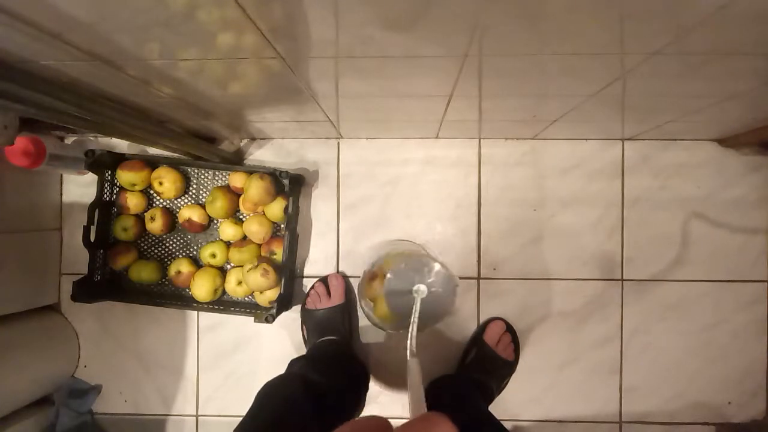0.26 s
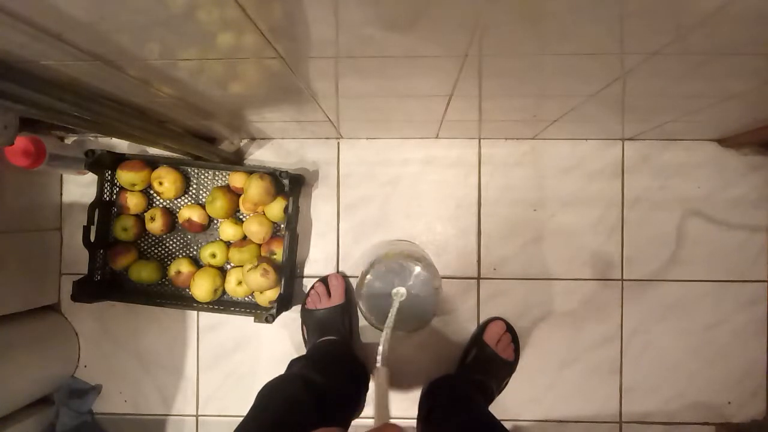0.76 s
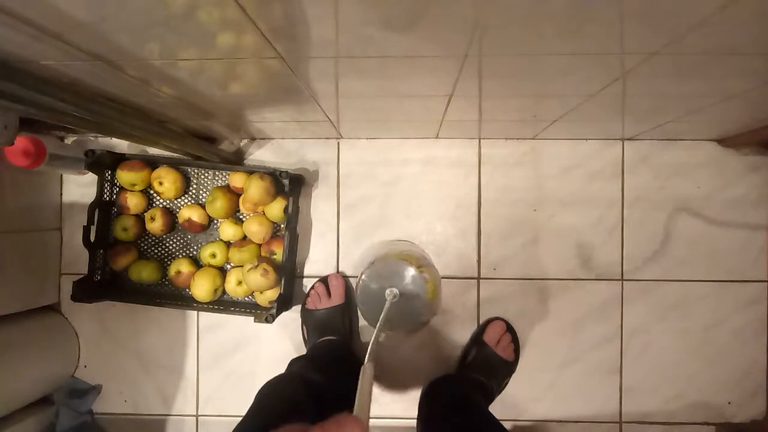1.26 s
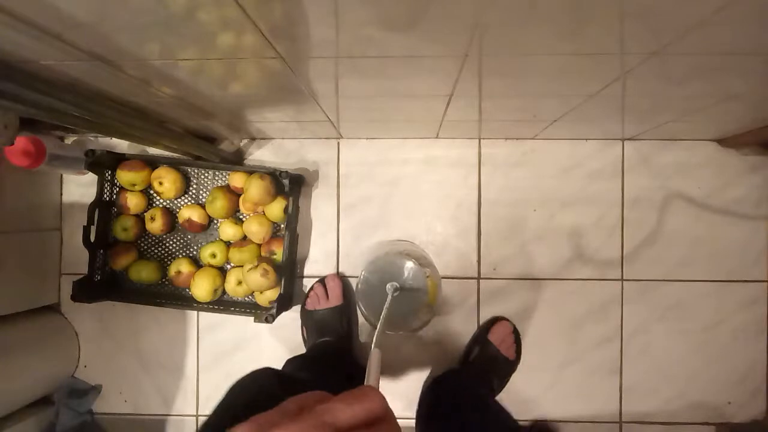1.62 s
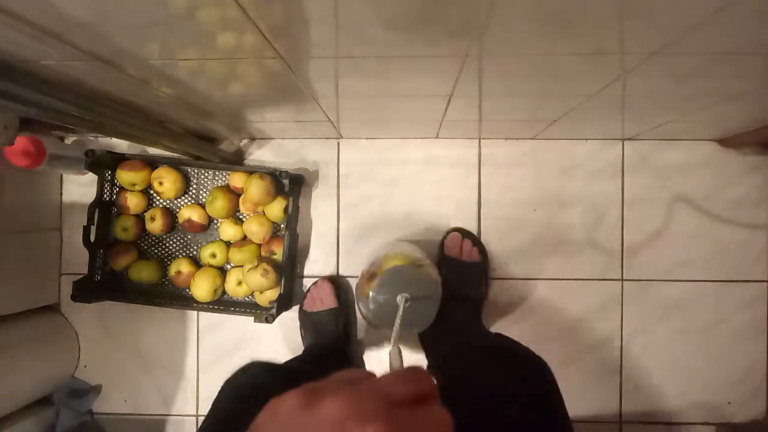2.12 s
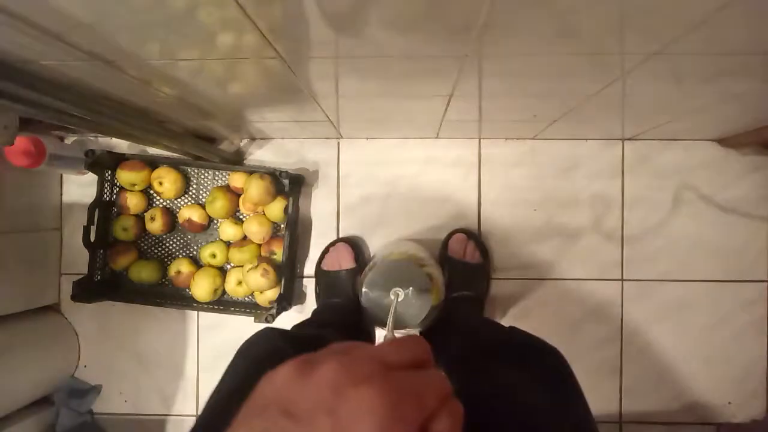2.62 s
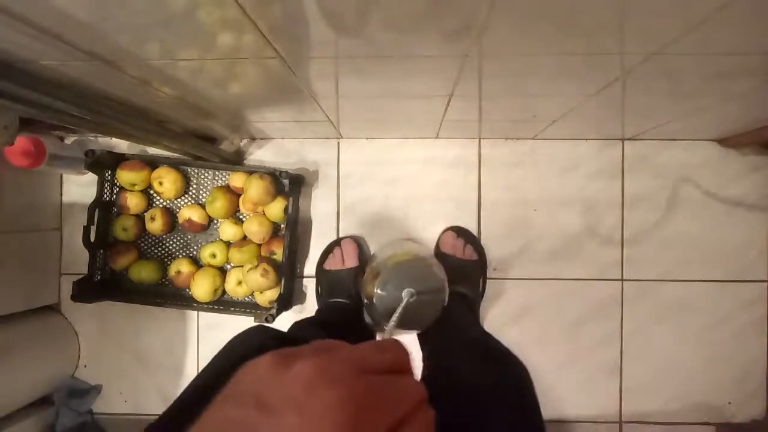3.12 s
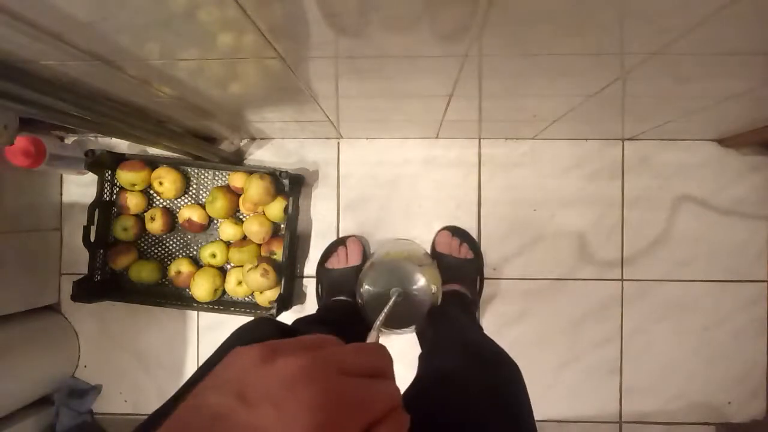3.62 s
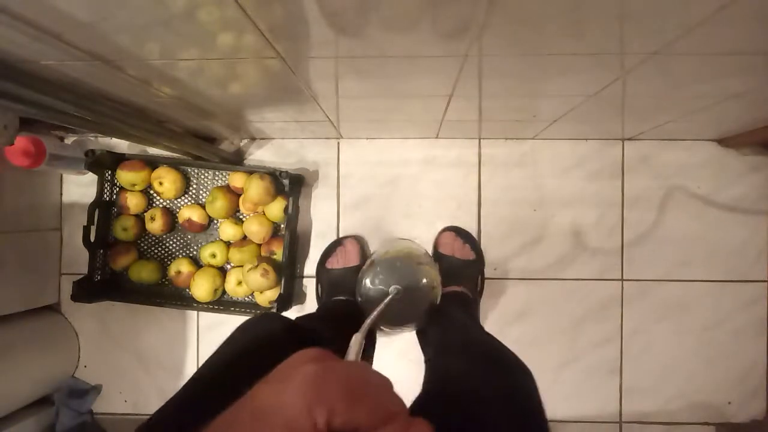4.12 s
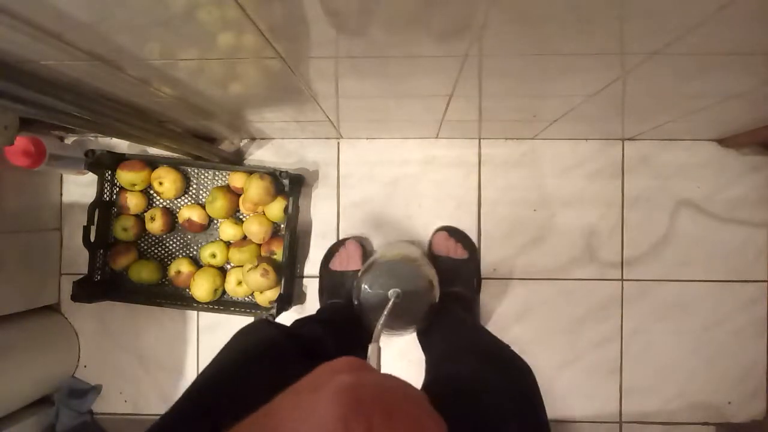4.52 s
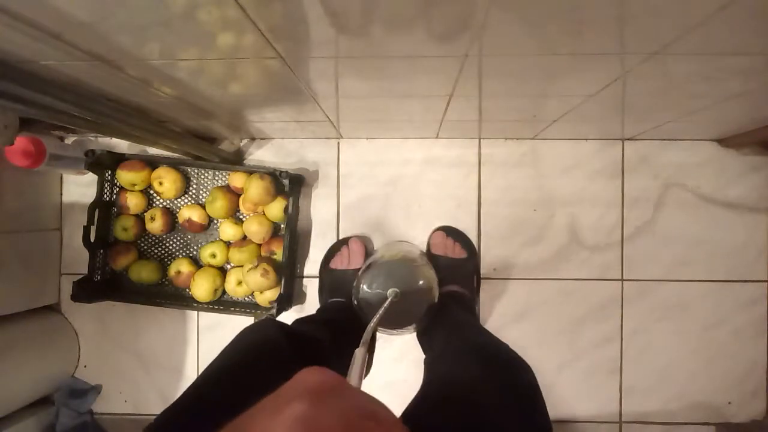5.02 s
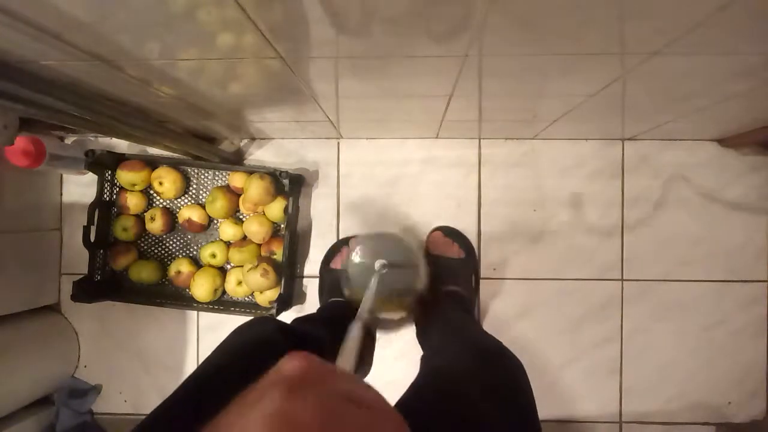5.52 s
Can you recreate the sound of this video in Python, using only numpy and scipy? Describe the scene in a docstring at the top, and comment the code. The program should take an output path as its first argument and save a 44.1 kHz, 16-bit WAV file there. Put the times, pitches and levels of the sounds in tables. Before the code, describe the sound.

Hollow plastic knocks, wet fruit crunches and sandal shuffles grow rougher for five seconds before a drill bursts into dense rattling churn and whine.

```python
"""In a small tiled room a steel rod on a drill pokes about in a plastic bottle of apples on the floor.
From the start it knocks the wall (noise contacts, rung modes) and rubs the fruit (filtered random clicks);
the bottle booms, the floor shudders, sandals shuffle (swells of hiss), later the tip squeaks (short sines).
From 5.2 s the drill spins up: rub and rumble grow, apple lumps hit the wall (damped sines), a motor whines."""
import sys
import numpy as np
from scipy import signal
from scipy.fft import rfft, irfft
from scipy.io import wavfile
from scipy.ndimage import uniform_filter1d

SR = 44100
rng = np.random.default_rng(int(sys.argv[2]) if len(sys.argv) > 2 else 0)


def unload_audio(sound):
    """Save the sound as a 16-bit wav file, at the path given as the first command line argument."""
    columns = np.transpose(np.atleast_2d(sound))
    # keep every value between -1 and 1, then stretch to whole-number steps
    steps = np.round(np.clip(columns, -1, 1) * 32767)
    wavfile.write(sys.argv[1], SR, steps.astype(np.int16))


N = 254016
T = np.arange(N) / SR

# Sign of the side signal, left then right.
SIDES = np.array([[1], [-1]])
# Rod blows. Each row: start in seconds, wall ring level in dB, ring pitch in Hz, thump level in dB,
# crunch level in dB, crack level in dB, contact in ms.
KNOCKS = [(0.003, -37, 625, -29.5, -35.5, -43, 9.1), (0.095, -24.5, 796, -32, -25.5, -33, 11.6),
          (0.114, -24.5, 830, -24.5, -45, -52, 6.7), (0.195, -26.5, 690, -34, -31, -40, 12.3),
          (0.289, -31.5, 1040, -13.5, -42, -53, 9.5), (0.323, -32, 2150, -33, -29.5, -34.5, 12.6),
          (0.384, -60, 900, -60, -45, -37, 1.5), (0.422, -31.5, 600, -15.5, -27.5, -32, 10.8),
          (0.538, -31.5, 820, -29, -37.5, -43.5, 5.1), (0.652, -52, 660, -41, -71, -73, 4.7),
          (0.721, -34.5, 660, -25, -46, -54, 78), (0.772, -21.5, 730, -24, -23, -22, 22.3),
          (0.867, -13.5, 680, -25, -9.5, -14, 11.1), (0.888, -37, 515, -16, -42, -45, 5.8),
          (1.035, -32, 520, -59, -48, -52, 9.1), (1.248, -40, 820, -25.5, -50, -45, 12.4),
          (1.341, -25, 800, -23, -20, -32.5, 21.5), (1.363, -15, 760, -14.5, -43, -29, 1.4),
          (1.441, -26, 574, -50, -26, -29.5, 8.8), (1.572, -33, 1400, -39, -27.5, -37, 3.9),
          (1.722, -13.5, 915, -9.5, -11.5, -18.5, 11.7), (1.808, -31, 530, -44, -32, -53, 5.9),
          (1.871, -30.5, 557, -52, -35, -43, 13), (1.886, -23, 510, -20, -18.5, -27.5, 18),
          (1.955, -30, 684, -17, -34, -33, 12), (2.046, -32.5, 506, -32, -34.5, -38, 12),
          (2.129, -26, 764, -33, -31, -33.5, 8), (2.147, -29.5, 900, -21, -29, -35, 6),
          (2.326, -31.5, 640, -36, -45, -44.5, 52), (2.384, -37, 826, -21, -40, -38.5, 83),
          (2.609, -24, 656, -39, -25.5, -32, 7.9), (2.62, -15, 1230, -14, -15, -23.5, 6.5),
          (2.716, -16, 470, -13.5, -24.5, -37, 8.6), (2.912, -18.5, 855, -25.5, -20.5, -28, 15.4),
          (2.995, -25.5, 654, -21, -26, -28.5, 10), (3.1, -32.5, 825, -39.5, -49, -47, 65),
          (3.128, -32, 620, -23, -27, -39, 7.9), (3.171, -19, 910, -48, -15, -20.5, 8.6),
          (3.284, -12, 1960, -18, -11, -23, 10.2), (3.308, -16.5, 1910, -21, -11.5, -41, 7.5),
          (3.36, -18.5, 810, -27, -24, -77, 10), (3.387, -21.5, 680, -34, -26, -31, 6.8),
          (3.447, -11, 1770, -40, -16, -36, 6.4), (3.456, -27, 1400, -38, -23, -36, 6.5),
          (3.472, -34, 603, -46, -43, -23, 8.4), (3.504, -61, 748, -49, -53, -25.5, 6.2),
          (3.55, -6.5, 940, -6.5, -9.5, -9.5, 7.9), (3.578, -16.5, 714, -1.5, -18, -25.5, 17.7),
          (3.655, -5.5, 654, -31, -9, 0, 4.1), (3.701, -20.5, 610, -7.5, -29, -30.5, 36),
          (3.778, -32, 610, -48, -64, -26.5, 8.7), (3.85, -31, 1300, -69, -35, -30, 3.9),
          (3.917, -27.5, 1340, -28, -27.5, -26.5, 1.8), (3.97, -38, 736, -50, -45, -35, 5.1),
          (4.166, -22.5, 670, -24, -34, -44, 3.1), (4.189, -17, 1350, -25, -8.5, -4.5, 5.7),
          (4.231, -8.5, 2920, -31, -20, -7.5, 17.5), (4.369, -14, 1230, -38, -51, -2, 6.1),
          (4.433, -8, 680, -11.5, -19, -4.5, 3.3), (4.469, -16.5, 714, -37, -10.5, 0.5, 7.3),
          (4.522, -12.5, 706, -12, -11.5, -20, 11.3), (4.555, -7.5, 1290, -46, -33, 3, 2.84),
          (4.58, -18, 710, -27, -25, -38, 5.8), (4.611, -20.5, 695, -17, -31, -32, 29),
          (4.632, -15.5, 460, -16, -18, -43, 3.4), (4.774, -32, 1250, -62, -30, -47, 2),
          (4.843, -35.5, 1870, -34, -63, -27, 15.7), (4.992, -39.5, 860, -31.5, -50, -70, 57),
          (5.023, -31, 470, -50, -50, -25.5, 5.6), (5.063, -32, 470, -56, -43, -33, 13),
          (5.103, -34, 2570, -44, -52, -56, 6.3), (5.122, -39, 2700, -48, -44, -42, 5.4),
          (5.146, -53, 2700, -54, -34, -34, 5.6), (5.162, -32, 1440, -53, -28, -18.5, 5.4),
          (5.182, -21, 1300, -38, -21.5, -23, 16), (5.207, -34, 1350, -32, -21, -33, 5.2),
          (5.228, -16, 2170, -46, -52, -2, 7.4), (5.29, -21.5, 805, -20, -10, -30, 13),
          (5.322, -32, 670, -12, -10, -37, 9), (5.368, -6.5, 920, -9.5, -11, -14.5, 5.7),
          (5.395, -14, 1400, -23, -13, -18, 10), (5.424, -7.5, 706, -11, -8, -23, 11),
          (5.447, -14, 1400, -28, -5.5, -38, 5.6), (5.468, -16, 725, -9, -25, -37, 15),
          (5.489, -21, 770, -28, -33, -36, 2.8), (5.518, -18, 710, -21, -20, -25, 4.7),
          (5.532, -19, 810, -17, -10, -12.5, 10), (5.561, -13, 560, -3, -9.5, -17, 19),
          (5.589, -12, 1800, -27, -16, -20, 2.7), (5.628, -10, 724, -17, -7.5, -10.5, 11.8),
          (5.677, -12, 1360, -1, -28, -28, 1.4), (5.708, -19, 1520, -4, -29, -37, 4.4),
          (5.728, -12, 514, -15, -9.5, -33, 6.6), (5.75, -14, 1600, -20, -10, -11, 5.2)]
# Modes of the bottle wall and its air. Each row: pitch in Hz, relative level in dB, T60 in seconds.
BOTTLE = [(169, -12, 0.43), (214, 7, 0.079), (229, 4.5, 0.31), (250.3, 1.5, 0.27), (304, -19.5, 0.38),
          (351.8, -8, 0.41), (421.2, -2.5, 0.2), (442.5, -13.5, 0.65), (592.4, 0.5, 0.14),
          (720, -5.5, 0.26), (763, -7.5, 0.44), (807, -5, 0.19), (938, 8, 0.056), (1249, -5.5, 0.32),
          (1396, 17, 0.04)]
# The boom as feet and fruit shift. Each row: time in seconds, upper deep mode over the lower ones in dB,
# shaking by the rod in dB.
BOOM = [(0.0, 19, -68), (0.06, 33, -79), (0.18, 26, -74), (0.23, 16, -69), (0.4, 16, -62), (0.6, -14, -103),
        (0.8, -1, -59.5), (0.92, -28.5, -95), (1.1, -13, -85), (1.28, 13, -63), (1.4, -16, -71),
        (1.65, 11, -64.5), (1.8, -6, -59.5), (2.1, -5, -68.5), (2.3, -10, -70), (2.5, 10, -61),
        (2.75, -5, -90), (2.88, -1, -78), (3.3, -6, -59), (3.52, -13.5, -83), (3.66, 4, -59),
        (3.8, -9, -67.5), (4.05, -10, -87), (4.3, -9, -57.5), (4.45, 4, -71), (4.62, -4, -61.5),
        (4.8, -2, -78), (5.05, -11, -80), (5.2, 0, -80), (5.4, 1, -57), (5.76, -8, -62)]
# Spectrum of cracks and rasp. Each row: frequency in Hz, gain in dB.
CRACK = [(400, -25), (1500, -9.5), (3000, -6), (4500, -3.5), (6000, 0), (8000, -6.5), (11000, -13),
         (13500, -20), (15000, -10.5), (15600, -16)]

MODE_HZ = np.array(BOTTLE)[:, :1]
DEEP_TOP_HZ, UPPER_DEEP_HZ = 280, 240  # whole-bottle modes lie below the first
DRILL_ON_S, SPIN_UP_S = 5.2, 0.13  # trigger pulled; time to full speed


def undb(db):
    """Decibels to gain."""
    return 10 ** (np.asarray(db) / 20)


def unit(x):
    """Scale to rms 1."""
    return x / np.sqrt(np.mean(x ** 2))


def smooth_noise(width):
    """Slow random signal of rms 1: white noise averaged over a width in samples."""
    return unit(uniform_filter1d(rng.standard_normal(N), width))


def colour(x, points, power=1):
    """Filter along the last axis by (Hz, dB) points, the dB scaled by power."""
    hz, db = np.transpose(points)
    f = np.maximum(np.fft.rfftfreq(x.shape[-1], 1 / SR), 1)
    gain_db = power * np.interp(np.log(f), np.log(hz), db)
    return irfft(rfft(x) * undb(gain_db), x.shape[-1])


def uneven(points, chance, depth_db):
    """A colour with random third-octave bumps: no two spots of wall or fruit sound alike."""
    hz = 300 * 2 ** (np.arange(len(chance)) / 3)
    point_hz, point_db = np.transpose(points)
    base_db = np.interp(np.log(hz), np.log(point_hz), point_db)
    return [(100, base_db[0] - 20)] + list(zip(hz, base_db + depth_db * chance))


def ring(x, hz, t60_s):
    """One damped mode, a complex one-pole resonator."""
    pole = np.exp(2j * np.pi * hz / SR - np.log(1000) / (max(t60_s, .002) * SR))
    return signal.lfilter([1], [1, -pole], x).imag


def grains(rate_hz, spread_db):
    """Random clicks with a few much larger than the rest."""
    when, sign, size = rng.random((3, N))
    return (when < rate_hz / SR) * np.sign(sign - .5) * undb(-spread_db * np.log(size + 1 / 50))


def spin(power):
    """Crusher speed from 0 to 1, raised to a power."""
    return np.clip((T - DRILL_ON_S) / SPIN_UP_S, 0, 1) ** power


def bottle(drives, lo_hz, hi_hz):
    """The bottle's modes between two frequencies, each with its own drive and its own lean to one side."""
    swell_t60_s = 0.092
    out = 0
    s, upper_db, _ = np.transpose(BOOM)
    tilt_db = np.interp(T, s, upper_db) / 2
    leans = rng.standard_normal(len(BOTTLE))
    for (hz, db, t60_s), drive, lean in zip(BOTTLE, drives, leans):
        if not lo_hz <= hz < hi_hz:
            continue
        drive = drive[:N]
        if 200 < hz < DEEP_TOP_HZ:
            # a second resonance makes the boom swell late
            tilted = drive * undb(tilt_db * np.sign(hz - UPPER_DEEP_HZ))
            drive = ring(tilted, hz, swell_t60_s) * 2 * np.log(1000) / (swell_t60_s * SR)
        out = out + undb(db) * ring(drive, hz, t60_s) * (1 + hz / 1230.0 * lean * SIDES)
    return out


def rumble():
    """Low shudder through the floor: always faint, more after thumps, under footfalls, with the drill on."""
    # Spectrum. Each row: frequency in Hz, gain in dB.
    rumble_colour = [(15, -15), (28, 10), (45, -2), (70, -4.5), (100, 12), (125, 5.5), (160, 10.5),
                     (250, -27.5)]
    # Footfalls on the tiles. Each row: middle in seconds, level in dB.
    footfalls = [(1.97, -47), (2.16, -51), (3.2, -47), (3.92, -34)]
    rest_db, spun_db = -53.5, -30
    jolt_db, jolt_s, footfall_s = -31, 0.032, 0.06  # jolt level is over each thump's own
    mid, side = colour(rng.standard_normal((2, N)), rumble_colour)
    level = undb(rest_db) + undb(spun_db) * spin(2.5)
    for s, _, _, thump_db, *_ in KNOCKS:
        level += undb(thump_db + jolt_db) * (T >= s) * np.exp(-np.abs(T - s) / jolt_s)
    for s, db in footfalls:
        level += undb(db) * np.exp(-((T - s) / footfall_s) ** 2)
    return level * unit(mid + 0.36 * side * SIDES)


def stir():
    """Steel drags over fruit and plastic in dense slips and lumps; separate random jolts shake the bottle."""
    # Rod dragged by hand. Each row: time in seconds, rub level in dB, rasp level in dB.
    drag_levels = [(0.0, -41, -53), (0.35, -32, -57), (0.62, -46.5, -62.5), (0.881, -23.5, -54),
                   (1.102, -48, -61), (1.3, -40, -70), (1.46, -22.5, -51), (1.58, -36, -47.5),
                   (1.8, -26, -45), (2.11, -38.5, -50), (2.19, -31.5, -44), (2.31, -33, -42),
                   (2.44, -33, -45), (2.74, -27, -43), (2.87, -38, -55), (3.37, -23.5, -36.5),
                   (3.53, -61, -71), (3.662, -20, -40), (3.98, -38.5, -49), (4.15, -33, -39),
                   (4.321, -18.5, -29), (4.38, -89, -50), (4.602, -11, -29.5), (4.81, -66, -49.5),
                   (5.05, -22.5, -48.5), (5.2, -67, -55)]
    # Rub spectrum. Each row: frequency in Hz, gain in dB.
    rub_colour = [(100, -55), (250, 13.5), (450, 5.5), (800, 0), (1400, -5), (2200, -5.5), (3500, -14),
                  (6000, -59)]
    spun_rub_db, spun_rasp_db, spun_shake_db = -12, -16, -54  # added at full speed
    s, *columns = np.transpose(drag_levels)
    rub_db, rasp_db = (np.interp(T, s, c) for c in columns)
    lumps_db = smooth_noise(int(SR / 45))

    rub_level = undb(rub_db) + undb(spun_rub_db) * spin(1.5)
    rub = colour(rub_level * undb(3.0 * lumps_db) * unit(grains(800, 3.0)), rub_colour)
    rasp_level = undb(rasp_db) + undb(spun_rasp_db) * spin(1.0)
    rasp = np.array([unit(colour(grains(6000, 1.0), CRACK)) for _ in SIDES])
    rasp = rasp * undb(2.6 * lumps_db) * rasp_level

    boom_s, _, shake_db = np.transpose(BOOM)
    shake = undb(np.interp(T, boom_s, shake_db)) + undb(spun_shake_db) * spin(5.8)
    shakes = [shake * unit(grains(400, 1.5)) for _ in BOTTLE]
    return rub + rasp, bottle(shakes, 0, DEEP_TOP_HZ)


def contact(s, contact_ms, hard_db, by_hand, chance, ms):
    """Force envelope and rise in ms: harder hand blows rise quicker, flying pulp cushions spun ones."""
    rise_share, sharper_db_per_db, spun_rise_share = 0.09, 0.37, 0.27  # shares of the contact
    debris_db, debris_lengths = -18, 2.9  # loose fruit settles for so many contact lengths
    share = rise_share * undb(-sharper_db_per_db * hard_db) if by_hand else spun_rise_share
    rise_ms = contact_ms * share
    shape = np.exp(-ms / max(contact_ms, .5)) * (1 - np.exp(-ms / rise_ms)) ** 2
    chatter = undb(2.56 * unit(uniform_filter1d(chance[4], 60)))
    settling = undb(debris_db + 5.5 * unit(uniform_filter1d(chance[3], 90)))
    settling = settling * np.exp(-ms / (debris_lengths * contact_ms)) * np.minimum(ms / 9.7, 1) ** 2
    return shape / shape.max() * chatter + settling, rise_ms


def knocks():
    """Each blow: a ragged contact that crunches, cracks, rings its spot of wall and pushes the whole bottle."""
    # Crunch spectrum. Each row: frequency in Hz, gain in dB.
    crunch_colour = [(300, -0.5), (700, -10.5), (1200, -11.5), (2000, -5.5), (3000, -7), (4500, -10),
                     (8000, -42)]
    middling_db = -20  # hardness at which the rise is the plain share of the contact
    snap_db = 26.5  # click of first touch for a 1 ms contact, weaker the longer it lasts
    clatter_db, clatter_cycles = -2.5, 18  # against the crunch; cycles to -60 dB per resonance
    length = 4096
    t = np.arange(length) / SR
    ms = t * 1000
    fade = np.clip((88 - ms) / 30, 0, 1)
    out, push = np.zeros((2, N + length)), np.zeros((len(BOTTLE), N + length))
    deep = MODE_HZ < DEEP_TOP_HZ  # these follow the thump, wall modes the ring
    start = np.sign(MODE_HZ - UPPER_DEEP_HZ)  # close deep modes start opposed, so they beat
    chances = rng.standard_normal((len(KNOCKS), 5, length))
    for (s, ring_db, hz, thump_db, crunch_db, crack_db, contact_ms), c in zip(KNOCKS, chances):
        here = slice(int(s * SR), int(s * SR) + length)
        by_hand = s < DRILL_ON_S + SPIN_UP_S / 2
        hard_db = max(ring_db, crack_db) - middling_db
        shape, rise_ms = contact(s, contact_ms, hard_db, by_hand, c, ms)
        mid, left, right = c[:3] * shape

        spot = unit(ring(ring(mid, hz, 6.9 / hz), hz, 6.9 / hz))

        rough = uneven(crunch_colour, c[0, -15:], depth_db=2.5)
        crunch = unit(colour(mid + 0.94 * c[3] * shape * SIDES, rough))
        # loose fruit and wall patches ring at their own pitches, alternately mid, left and right
        pitches_hz = 1300 * 2 ** (0.36 * np.arange(-4, 5) + 0.2 * c[2, -9:])
        sources = 3 * (mid, left, right)
        clatter = sum(unit(ring(x, f, clatter_cycles / f)) for f, x in zip(pitches_hz, sources))
        crunch = unit(crunch + undb(clatter_db) * unit(clatter))

        touch = signal.unit_impulse(length, np.argmax(ms > rise_ms))
        snap = by_hand * undb(snap_db) / contact_ms ** 1.26 * touch
        crack = colour(snap + np.array([left, right]) + 0.54 * mid, CRACK)
        crack = unit(colour(crack, uneven([(300, 0), (16000, 0)], c[1, -18:], depth_db=0.5)))

        blow = undb(ring_db) * spot + undb(crunch_db) * crunch + undb(crack_db) * crack
        out[:, here] += np.sqrt(np.mean(shape ** 2)) * blow * fade

        # every spot drives the modes in another mix
        sign = np.where(deep, start, np.sign(c[3, :len(BOTTLE), None]))
        mix = undb(3.5 * c[4, :len(BOTTLE), None]) * sign
        push[:, here] += undb(np.where(deep, thump_db, ring_db)) * mix * np.exp(-t / 0.00039)
    boom = undb(-32.5) * bottle(push, 0, DEEP_TOP_HZ) + undb(-32.0) * bottle(push, DEEP_TOP_HZ, 2000)
    return out[:, :N], boom[:, :N]


def shuffles():
    """A sandal sole slides on the tiles: a swell of gritty hiss."""
    # Each row: middle in seconds, length in seconds, centre in Hz, level in dB.
    slides = [(0.69, 0.017, 7000, -48), (1.429, 0.069, 6440, -31), (1.806, 0.016, 4160, -38),
              (2.034, 0.063, 4900, -33.5), (2.243, 0.094, 5500, -39.5), (2.425, 0.13, 5450, -39),
              (3.896, 0.027, 2920, -30.5), (4.104, 0.058, 4840, -36), (5.062, 0.05, 5530, -40)]
    out = np.zeros((2, N))
    for s, length_s, hz, db in slides:
        near = slice(int((s - .15) * SR), int((s + 0.17) * SR))
        band = [(hz / 4, -30), (hz / 3.0, -4), (hz, 0), (hz * 1.87, -5), (hz * 3, -22)]
        hiss = unit(colour(rng.standard_normal(out[:, near].shape), band))
        out[:, near] += undb(db) * hiss * np.exp(-4 * ((T[near] - s) / length_s) ** 2)
    return out


def squeaks():
    """The rod's tip squeaks on the wall: short pitched slips that swell and stop."""
    # Each row: middle in seconds, length in seconds, pitch at the middle in Hz, rise in Hz per second,
    # level in dB.
    slips = [(3.851, 0.0033, 1160, 0, -24), (3.922, 0.0022, 1290, 0, -26), (4.776, 0.0035, 1210, 31, -42),
             (5.171, 0.0037, 1200, 2, -28), (5.187, 0.0022, 1120, 5000, -13),
             (5.191, 0.004, 1200, 5000, -20), (5.2, 0.004, 1140, 5000, -34),
             (5.208, 0.0021, 1210, 9000, -2.5), (5.231, 0.0086, 1155, 0, -17),
             (5.245, 0.0053, 1160, 0, -35)]
    out = np.zeros(N)
    for s, length_s, hz, rise_hz_per_s, db in slips:
        near = np.abs(T - s) < 3 * length_s
        t = T[near] - s
        swell = np.exp(-2 * (t / length_s) ** 2)
        out[near] += undb(db) * swell * np.sin(2 * np.pi * (hz * t + rise_hz_per_s * t ** 2 / 2))
    return out


def churn():
    """Lumps of apple hit the wall, each a short damped thud or chip with its own pitch and side."""
    # each: level at full speed in dB, lowest pitch in Hz, range in octaves, cycles to -30 dB, count
    thuds, chips = (-15.5, 300, 1.8, 7.0, 180), (-16, 900, 1.7, 9.0, 260)
    out, t = np.zeros((2, N)), np.arange(2048) / SR
    first = int(DRILL_ON_S * SR)
    for db, lo_hz, octaves, cycles, count in (thuds, chips):
        layer = np.zeros((2, N + 2048))
        for when, pitch, size, side in rng.random((count, 4)):
            i = int(first + when * (N - first))
            hz = lo_hz * 2 ** (octaves * pitch)
            decay = undb(-30 * t * hz / cycles)
            lump = undb(-2.6 * np.log(size + 0.033)) * np.sin(2 * np.pi * hz * t) * decay
            layer[:, i:i + 2048] += lump * (1 + (2 * side - 1) * SIDES)
        out[:, first:] += unit(layer[:, first:N]) * undb(db)
    return out * spin(2.9)


def whine():
    """Gear-mesh tone of the motor, throbbing and wavering at random under load."""
    # Each row: time in seconds, level in dB.
    whine_levels = [(5.25, -44), (5.4, -51), (5.6, -20), (5.73, -19), (5.76, -16)]
    centre_hz, waver_hz = 5700, 170  # waver is rms
    s, db = np.transpose(whine_levels)
    throb = unit(np.maximum(smooth_noise(int(SR / 90)), 0) ** 1.4)
    pitch_hz = centre_hz + waver_hz * smooth_noise(int(SR / 80))
    tone = np.sin(2 * np.pi * np.cumsum(pitch_hz) / SR)
    return undb(np.interp(T, s, db, left=-120)) * throb * tone


def echoes():
    """Octave bands of dense echoes, each dying at its own rate; the bass is more alike on both sides."""
    # Each row: band centre in Hz, T60 in seconds.
    room_t60 = [(125, 0.74), (250, 0.33), (500, 0.26), (1000, 0.31), (2000, 0.26), (4000, 0.2),
                (8000, 0.18), (14000, 0.17)]
    t, out = np.arange(SR // 2) / SR, 0
    for hz, t60_s in room_t60:
        band = [(hz / 2, -40), (hz / 1.58, -3), (hz, 0), (hz * 1.33, -3), (hz * 2, -40)]
        mid, side = colour(rng.standard_normal((2, len(t))), band)
        share = np.clip(hz / 660.0, 0, 1)
        out = out + (mid + share * side * SIDES) / np.sqrt(1 + share ** 2) * undb(-60 * t / t60_s)
    out = out * (1 - np.exp(-t / 0.0021))  # echoes build up over a few ms
    return out / np.sqrt(np.sum(out ** 2) / 2)


def room(x, count=8):
    """Tiled walls: the sound fades in turn through random echo patterns, so no single one colours it all."""
    room_db, patterns_per_s = -3, 9.0
    turn = (T * patterns_per_s) % count
    wet = 0
    for k in range(count):
        away = np.abs((turn - k + count / 2) % count - count / 2)
        share = np.cos(np.pi / 2 * np.minimum(away, 1))
        wet = wet + signal.fftconvolve((share * x.mean(axis=0))[None], echoes(), axes=1)[:, :N]
    return x + undb(room_db) * wet


def scene():
    """Bottle, feet and drill in the room over its hush and the floor's rumble."""
    # Spectrum of the hush. Each row: frequency in Hz, gain in dB.
    hush_colour = [(25, -42), (91, 15), (233, 19.5), (378, -7), (1170, 1), (1340, 10), (2490, -35),
                   (8580, -49), (12500, -64), (15500, -39)]
    hush_db, bottle_low_hz = -50, 176
    mid, side = colour(rng.standard_normal((2, N)), hush_colour)
    hush = undb(hush_db) * unit(mid + 0.45 * side * SIDES)
    blows, boom = knocks()
    rub, wall = stir()
    bottle_sound = room(blows + rub + shuffles() + squeaks() + churn() + whine()) + boom + wall
    # keep the low skirts of the bottle's modes out of the bass
    high_pass = signal.butter(4, bottle_low_hz, "high", fs=SR, output="sos")
    return signal.sosfilt(high_pass, bottle_sound) + rumble() + hush


def record(dry):
    """Left and right favour different bands; peaks round off and the top is cut."""
    # Each row: frequency in Hz, left minus right in dB.
    balance = [(60, 6), (110, -1), (200, 2.5), (380, 4.5), (700, 2), (1290, 0), (2380, 2.5), (4400, -0.5),
               (8120, -4.5), (15000, 2.5)]
    top_hz = 15520
    sides = np.array([colour(dry[0], balance, power=.5), colour(dry[1], balance, power=-.5)])
    low_pass = signal.ellip(8, .2, 70, top_hz, fs=SR, output="sos")
    return signal.sosfilt(low_pass, np.tanh(0.42 * sides) / 1.254)


dry = scene()
out = record(dry)
unload_audio(out)
```